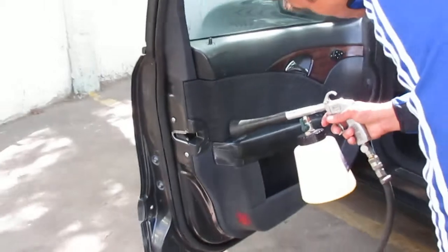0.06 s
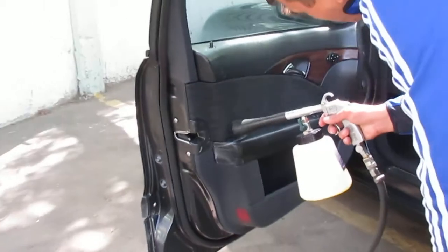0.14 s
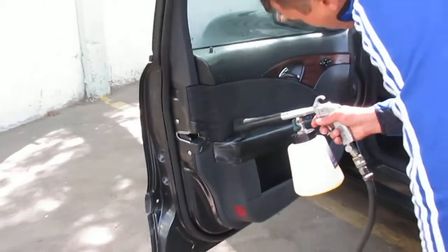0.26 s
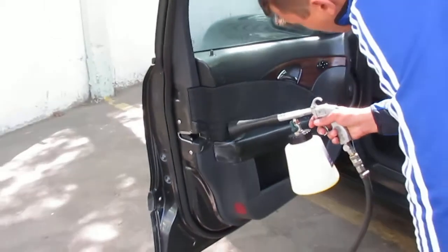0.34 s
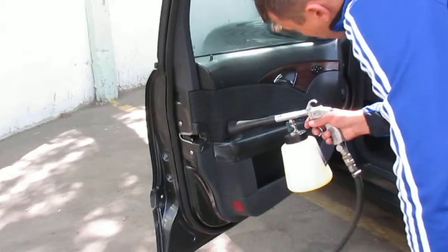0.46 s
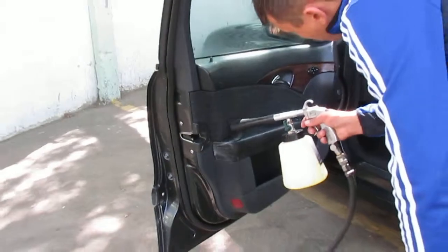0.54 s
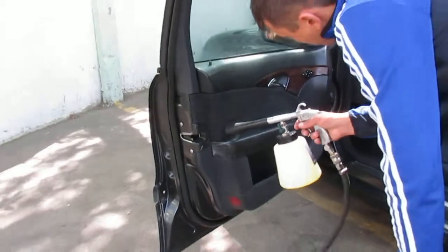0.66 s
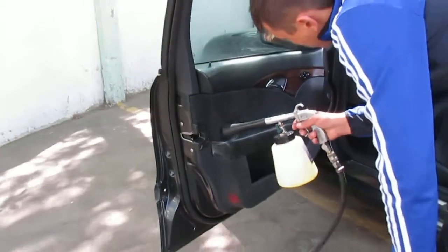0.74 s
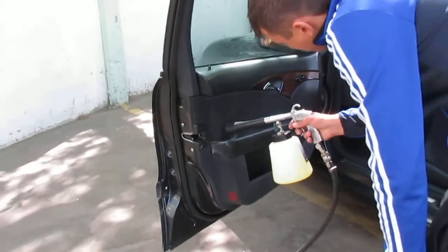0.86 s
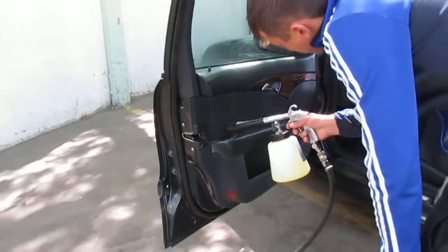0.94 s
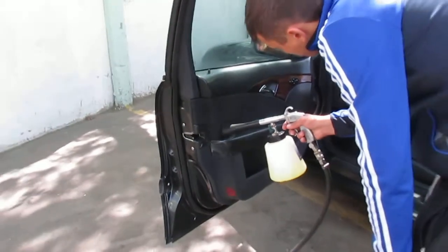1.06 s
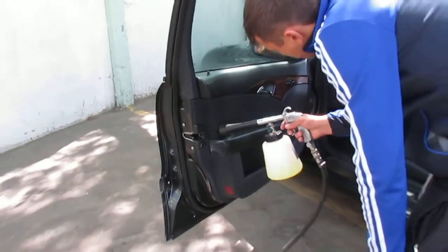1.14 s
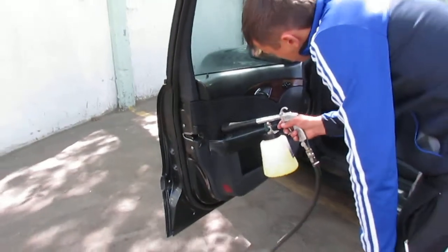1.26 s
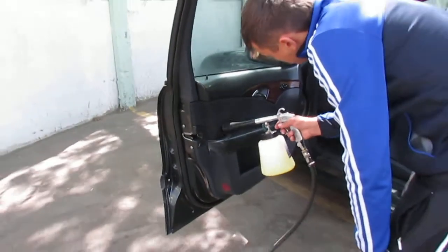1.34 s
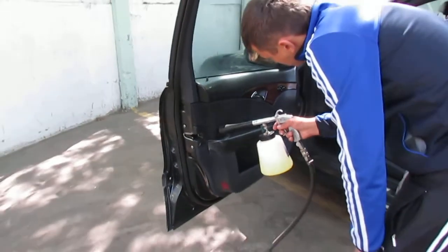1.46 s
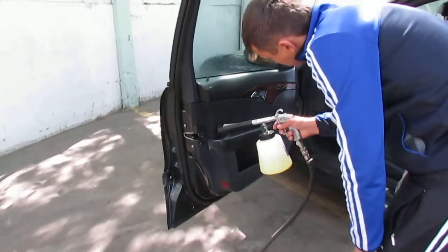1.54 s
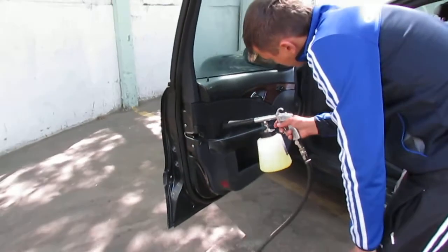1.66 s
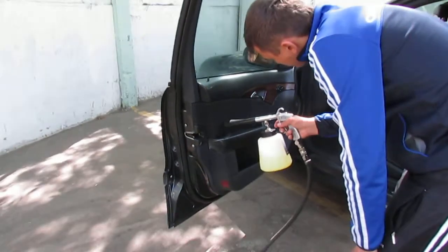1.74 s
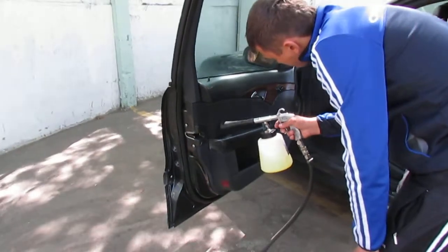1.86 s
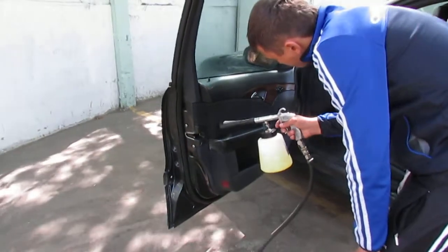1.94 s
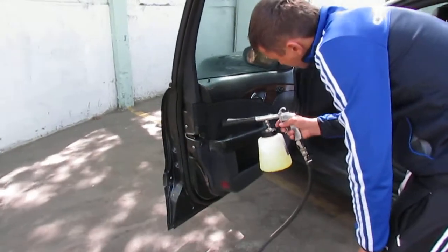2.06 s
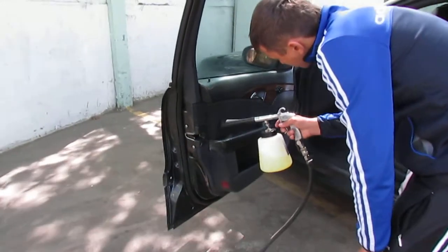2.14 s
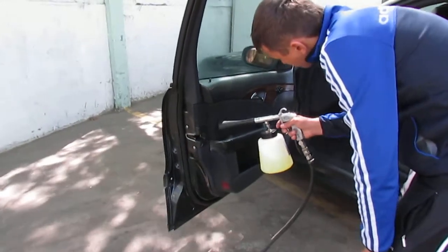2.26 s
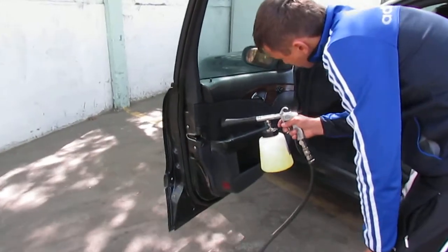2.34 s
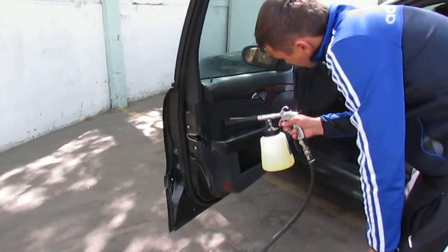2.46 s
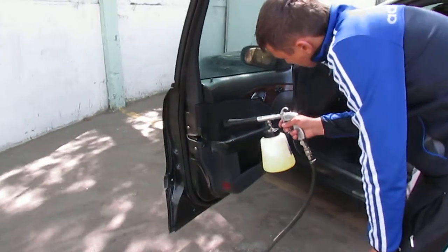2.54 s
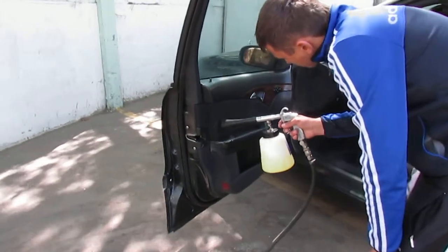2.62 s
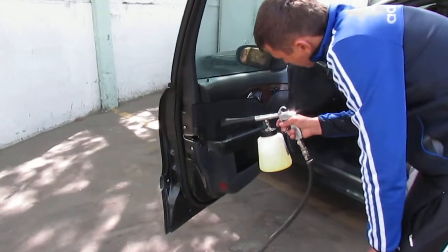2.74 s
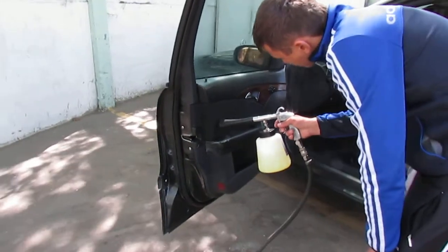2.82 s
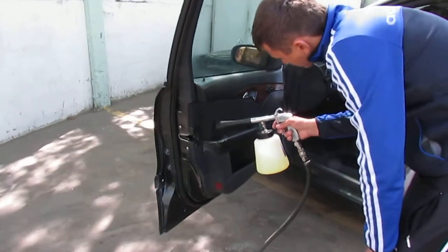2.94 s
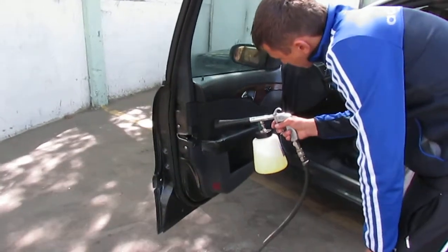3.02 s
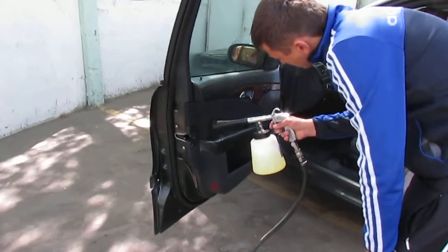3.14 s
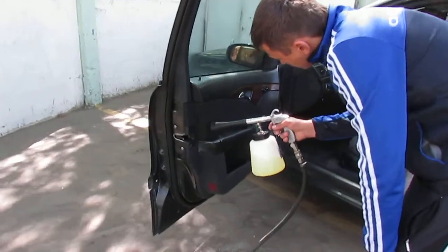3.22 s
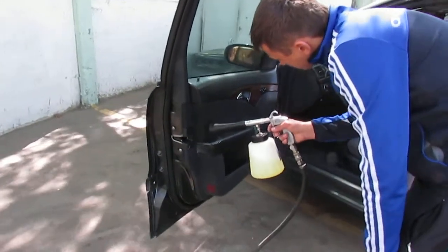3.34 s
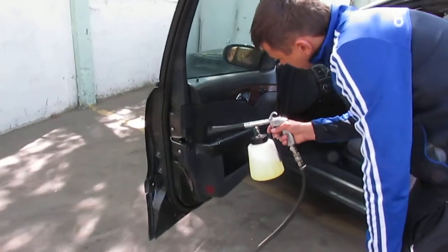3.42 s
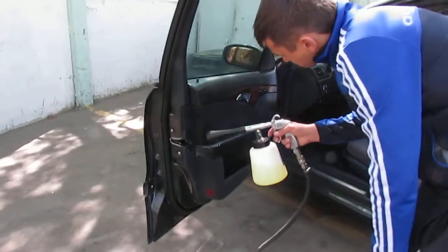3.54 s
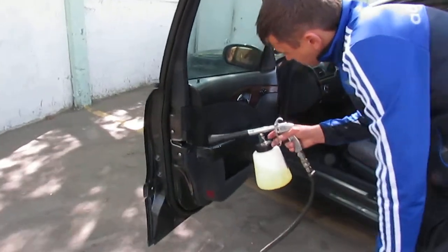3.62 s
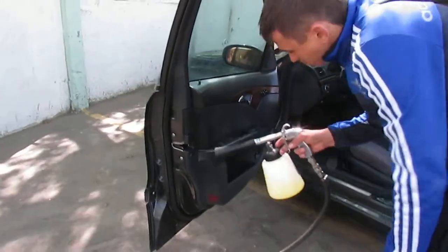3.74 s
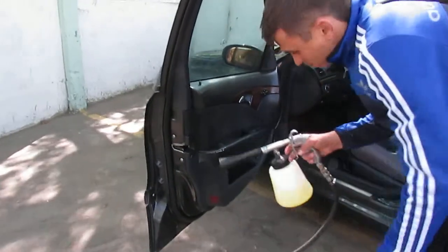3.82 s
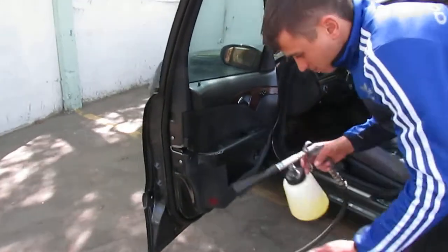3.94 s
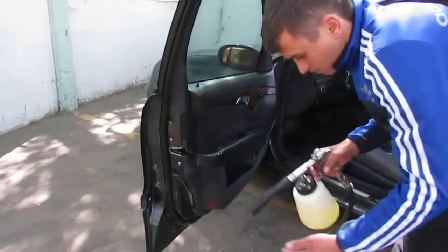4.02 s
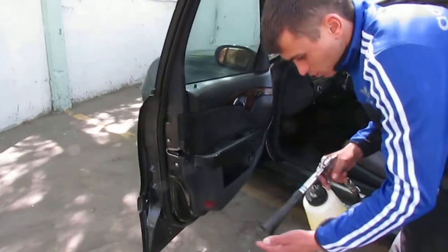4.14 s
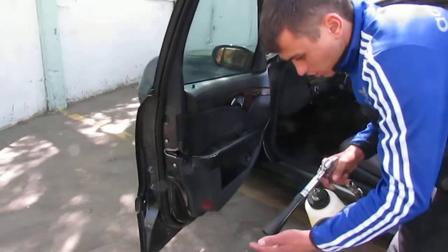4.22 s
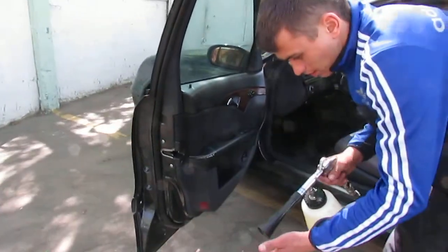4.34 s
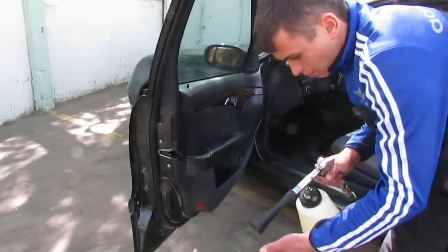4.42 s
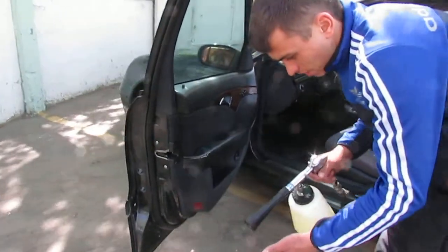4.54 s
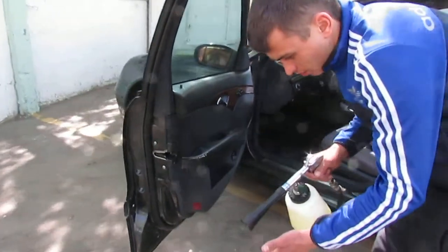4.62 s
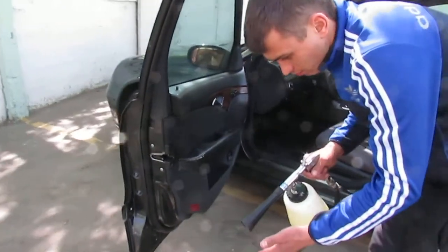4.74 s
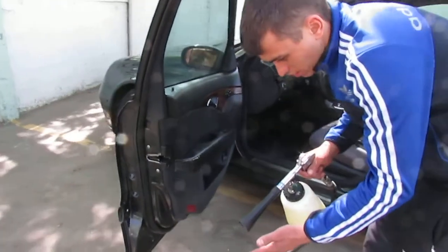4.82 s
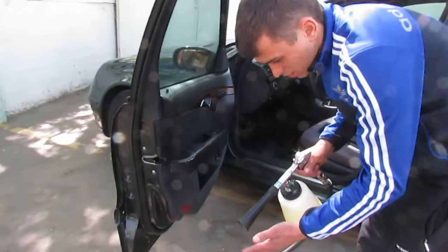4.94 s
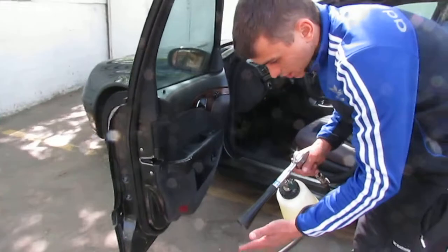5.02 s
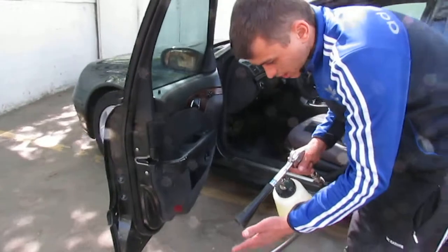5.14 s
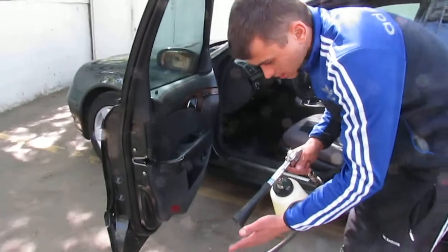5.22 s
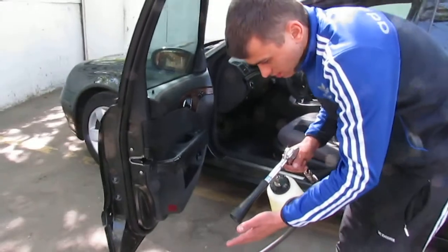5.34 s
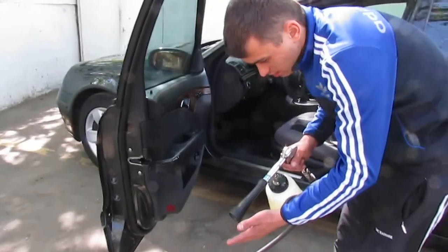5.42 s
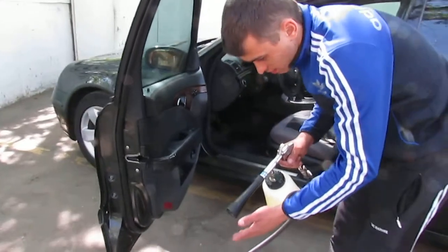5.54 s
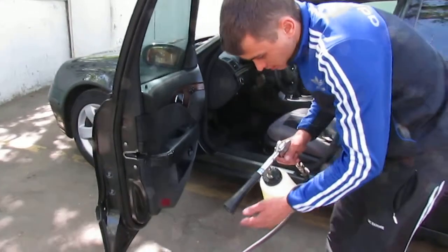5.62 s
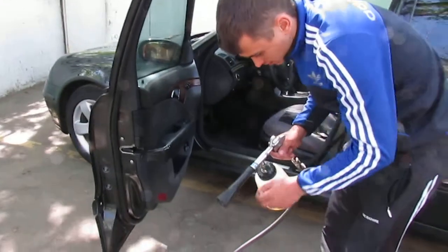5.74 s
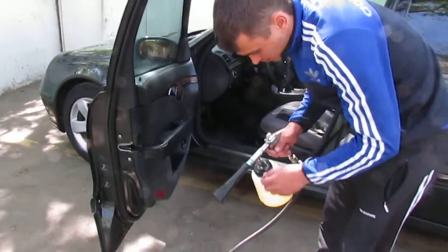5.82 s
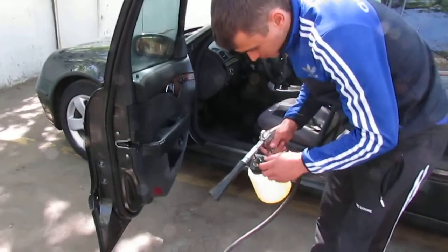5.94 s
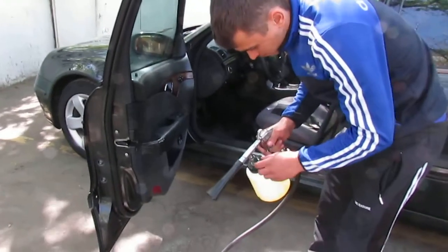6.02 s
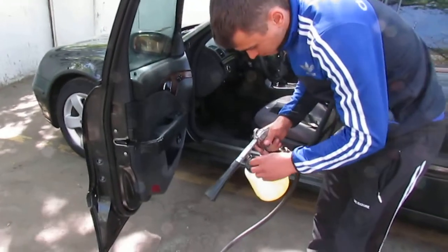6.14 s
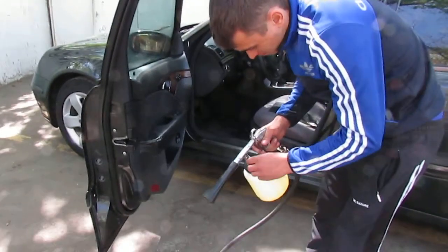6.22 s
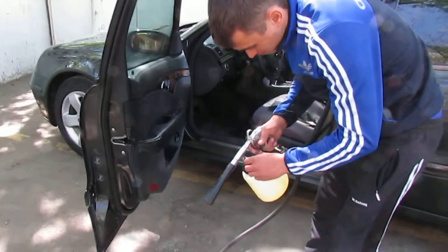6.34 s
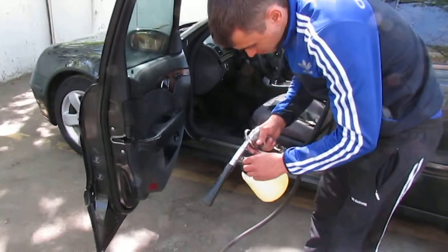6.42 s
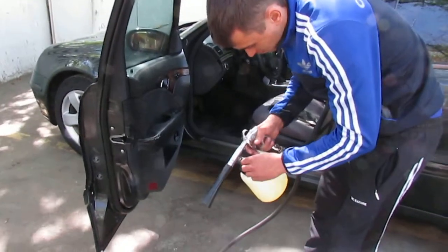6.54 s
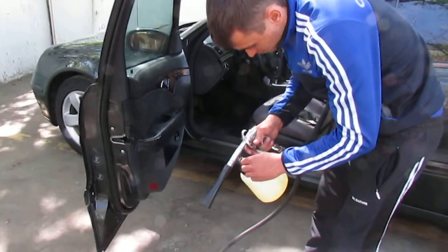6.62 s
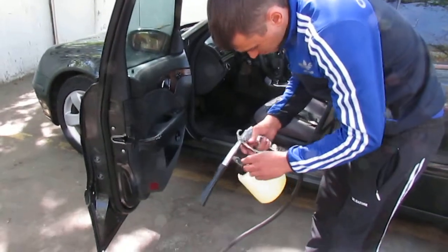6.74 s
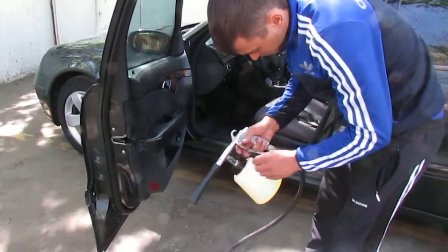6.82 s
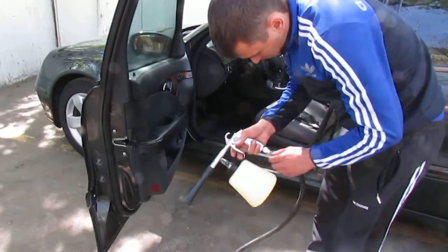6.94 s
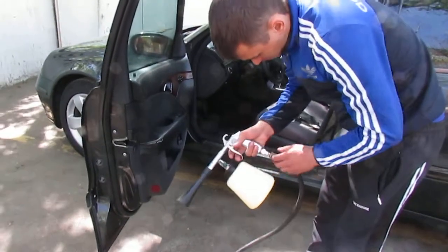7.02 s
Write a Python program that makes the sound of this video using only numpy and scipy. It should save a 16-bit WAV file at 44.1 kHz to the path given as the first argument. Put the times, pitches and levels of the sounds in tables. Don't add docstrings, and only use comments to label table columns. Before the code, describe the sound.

A compressed-air cleaning gun roars with bright hiss and a buzzing low hum, stops with a winding-down drop, blasts again briefly, then leaves faint leaking air.

```python
import sys
import numpy as np
from scipy import signal
from scipy.fft import rfft, irfft, next_fast_len
from scipy.io import wavfile
from scipy.ndimage import uniform_filter1d, map_coordinates

SR = 44100
rng = np.random.default_rng(int(sys.argv[2]) if len(sys.argv) > 2 else 0)


def ratio_of_db(decibels):
    return 10 ** (np.asarray(decibels, float) / 20)


def file_out(sig):
    cols = np.atleast_2d(sig).T
    lim = np.clip(cols, -1, 1)
    pcm = np.round(lim * 32767).astype(np.int16)
    wavfile.write(sys.argv[1], SR, pcm)


N = 312228

# (opens [s], shuts [s], coasting hum [dB], coasting [s], pressure left in hose [dB])
BLASTS = [
    (-.1, 3.603, -18.5, .115, -5),
    (4.273, 5.926, -18.5, 0.237, -1.5),
]
OPEN_S, SHUT_DB_PER_S, BLEED_DB_PER_S, HUM_SHUT_DB_PER_S = 0.011, 1300, 64, 524
# (time [s], closeness [dB], gap resonance [Hz], resonance lift [dB], turned to microphone [dB])
AIM_BY_BLAST = [
    [(0, -3, 850, 8, -1), (.65, -1, 863, 13.5, -1.5), (1.15, -5, 870, 10.5, -2.5), (1.62, -6, 885, 5, -2),
     (2.86, -5.2, 850, 7.5, -3.5), (3.0, -9.5, 1240, 4, -1.2), (3.25, -6.5, 1185, 7, -1.2),
     (3.42, -6, 1170, 10.5, -1.5), (3.56, -2, 620, 10.5, 0.5)],
    [(4.3, 0, 900, -4.5, 6), (4.45, -14, 890, 14, 2.5), (4.74, -18.5, 920, 22, 2.5),
     (5.0, -17, 1020, 10, 1.5), (5.1, -7, 880, 24, 2.5), (5.44, -10.5, 850, 20.5, 3.5),
     (5.55, -9, 850, 20, 6), (5.92, -16, 850, 18, 3)],
]
# (time [s], half length [s], lift [dB])
EDGES = [(.36, 0.028, 4.5), (.55, 0.016, -1), (.665, 0.11, 3), (.95, 0.11, 6.5), (1.1, 0.088, 6.5),
         (1.31, 0.037, 7), (1.45, 0.034, 7.5), (1.8, 0.017, 3), (2.1, 0.039, 1.5), (2.5, 0.044, 3.5),
         (2.88, 0.031, 2.5), (3.58, .03, 5.5), (5.14, 0.013, 1), (5.4, .05, 4), (5.88, 0.037, 1.5)]
GAP_WIDTH, GAP_DOUBLE, EDGE_RINGS_DB_PER_DB = 0.11, 0.98, 0.67

# (time [s], speed [Hz])
SPIN = [(0, 212.6), (1.1, 211.2), (2.2, 213.3), (3.6, 214.3), (3.82, 143), (3.9, 128), (4.28, 84),
        (4.446, 149), (4.58, 159), (4.66, 177), (4.756, 193), (4.9, 203), (5.06, 208.6), (5.3, 211.2),
        (5.93, 212.2), (6.07, 166), (6.142, 152), (6.25, 137)]
# (time [s], half length [s], lift [dB])
TILTS = [(.08, 0.15, 14.5), (.43, 0.12, 12), (.76, .09, 10), (1.12, 0.18, 10.5), (1.57, 0.088, 8.5),
         (2.2, 0.56, 7.5), (3.1, 0.57, 6.5), (3.52, 0.15, 5), (5.0, .32, 13)]
# door, palm [dB]
LOPSIDED_DB = [-34, -40]
# (order, on door [dB], on palm [dB])
SLAP_ORDERS = [(3, -37, -51.5), (4, -33.5, -54), (5, -37, -50.5), (6, -34, -66), (7, -37, -53),
               (8, -43.5, -52.5), (9, -42, -51), (10, -46, -54), (11, -47, -52), (12, -58, -57)]
FULL_HZ, HUM_DB, HUM_DB_PER_OCTAVE = 208, -19, 17
PALM_HUM_DB, HUM_DAMPED_DB_PER_DB, SLAP_GROWS_DB_PER_DB = 2.5, 0.17, 0.23

# (frequency [Hz], density [dB per Hz])
HISS = [(1470, -40), (2500, -5.5), (3760, -3), (5590, 1), (6030, -1), (6560, -2.5), (7840, 1), (8360, -7),
        (11500, -11.5), (15000, -46), (22000, -120)]
# (frequency [Hz], density [dB per Hz])
FIZZ = [(5290, -20), (9000, 0.5), (11900, -1.5), (13000, -1), (14500, -4.5), (15700, -3.5)]
# (frequency [Hz], density [dB per Hz])
DOOR_SPLASH = [(150, -60), (250, -22), (360, -15), (500, -14.5), (845, 1), (1150, -8.5), (1500, 0.5),
               (2200, -7), (3800, -10.5), (4940, -20.5), (8360, -120)]
# (frequency [Hz], density [dB per Hz])
PALM_SPLASH = [(160, -36), (280, 2.5), (500, -3.5), (900, 2), (1200, 2), (1790, 3.5), (2230, 0.5),
               (3800, -8), (4940, -18), (8360, -120)]
# (frequency [Hz], width [Hz], lift [dB])
CONE = [(900, 53, 1), (1733, 42, 3), (2720, 540, 2.5), (6610, 710, 4), (10470, 680, 2)]
# (frequency [Hz], width [Hz], lift [dB])
DOOR_SHADOW = [(3470, 390, -2.5), (6860, 830, -1.5)]
# (delay [ms], gain)
DOOR_ECHO = [(.24, 0.016), (1.15, 0.01), (1.43, 0.048), (1.71, 0.16), (2.53, 0.066), (3.3, 0.037)]
# (delay [ms], gain)
HAND_ECHO = [(.34, 0.033), (1.07, 0.13), (1.22, 0.074), (1.55, 0.098), (2.1, .06), (3.1, 0.057)]
# hiss, fizz, splash [dB]
BLEED_DB = [-28, -31.5, -14]
HISS_DB, FIZZ_DB, SPLASH_DB, PALM_SPLASH_DB, PALM_FIZZ_DB = -23.5, -19, -21, 4.5, -2
THROB = 0.23
FIZZ_TURNS_DB_PER_DB, FIZZ_HIDDEN_DB_PER_DB, FIZZ_TILTED_DB_PER_DB = 0.85, 0.18, 0.089

# (frequency [Hz], t60 [s])
WALLS_T60 = [(200, .3), (2000, 0.24), (10000, 0.26), (15000, 0.16)]

# (frequency [Hz], density [dB per Hz])
RUMBLE = [(20, -25), (50, -9.5), (100, -3.5), (200, -8.5), (400, -22.5), (800, -50.5), (3000, -120)]
# (time [s], half length [s], level [dB])
PUFFS = [(0, 0.14, -43), (.41, .05, -42), (1.87, 0.1, -48), (2.09, 0.14, -45), (2.38, 0.11, -60),
         (2.57, 0.046, -25), (2.8, 0.3, -32.5), (3.03, .05, -45), (3.47, 0.022, -31), (3.81, .04, -34),
         (3.89, 0.045, -37.5), (3.95, 0.023, -49), (4.03, 0.046, -35), (4.075, 0.014, -40),
         (4.3, 0.073, -48), (4.52, .06, -38), (4.75, 0.14, -46), (5.19, .05, -52), (6.6, 0.8, -50.5)]
# (time [s], push, width [ms])
GUSTS = [(.405, .05, 3.6), (1.88, -0.061, 3), (2.079, 0.032, 3.92), (2.349, -0.046, 4), (2.423, 0.1, 2.98),
         (2.5, 0.039, 3), (2.547, -0.079, 3.4), (2.5571, -0.35, 0.81), (2.596, 0.26, 2.4),
         (2.646, 0.23, 1.5), (2.715, -0.032, 2.2), (2.736, -0.12, 2.9), (2.758, 0.23, 1.1),
         (2.927, 0.087, 2.9), (3.053, 0.18, 2.3), (3.438, 0.18, 2.2), (3.496, 0.028, 3.2),
         (3.808, -0.11, 1.9), (3.941, 0.1, 2.3), (4.064, 0.12, 1.2), (4.084, 0.082, 1.4)]
CALM_DB = -64.5

# (frequency [Hz], density [dB per Hz])
TRAFFIC = [(24, -38), (40, -8.5), (100, -19), (180, -11), (400, -13), (600, -16), (1000, -17.5),
           (1400, -22), (2500, -29.5), (4500, -43), (6000, -61), (12000, -67.5), (15500, -56.5)]
# (frequency [Hz], width [Hz], lift [dB])
DRONE = [
    (300, 130, 4.5),
    (972, 150, 10.5),
]
# (frequency [Hz], density [dB per Hz])
LEAK = [(1760, -41.5), (3000, -12), (4300, -8.5), (5600, -11), (7300, -9.5), (9000, -7), (9600, -18),
        (13800, -26), (15500, -42.5)]
# (frequency [Hz], width [Hz], lift [dB])
COUPLING = [(5360, 400, 4), (6480, 260, 12), (8550, 720, 1), (11800, 120, 11), (13600, 150, 1)]
# (frequency [Hz], density [dB per Hz])
LEAK_EDGE = [(8000, -54), (9200, 7.5), (9800, 2.5), (10300, 7), (10800, -31), (12000, -120)]
TRAFFIC_DB, LEAK_DB, LEAK_DB_PER_S, EDGE_DB, EDGE_DB_PER_S = -52, -52.5, 12.5, -46.5, 28.5

# (time [s], length [s], start frequency [Hz], level [dB], width [Hz])
WHISTLES = [
    (3.63, .2, 3980, -50, 130),
    (4.51, .08, 655, -28, .5),
    (4.58, .2, 615, -39, .5),
    (6.02, .2, 3960, -57, 220),
    (6.12, .09, 445, -37, .5),
    (6.02, .22, 1420, -49, 40),
]
WHISTLE_SAG_HZ_PER_S = 430

# (time [s], peak [dB])
TICKS = [
    (4.0404, -30.5),
    (4.1929, -40.5),
    (4.239, -41),
]
# (frequency [Hz], gain [dB])
TICK_COLOUR = [(600, -28), (1500, 1.5), (6000, -6.5), (8000, -19), (11000, -70)]

# (frequency [Hz], density [dB per Hz])
SPRAY = [(250, -40), (500, -31.5), (900, 5), (2500, 4), (5000, 3), (9000, -23), (15000, -66.5)]
SPIT_S, SPIT_FADE_S, SPIT_DB, SPIT_SLAP_DB = 0.12, 0.02, -23.5, 17

# (time [s], drop [dB])
DUCKS = [(-.5, 5), (.675, 3.5), (1.59, 0.2), (2.565, 3), (3.57, 6), (4.331, 3.5), (5.461, 3.5)]
DUCK_S, RECOVER_S = 0.019, 1.085


def unit(x):
    return x / np.sqrt(np.mean(x ** 2) + 1e-20)


def along(points, hz):
    f, v = np.transpose(points)
    return np.interp(np.log(hz + 1), np.log(f + 1), v)


def curves(tables):
    s, *cols = np.vstack(tables).T
    return [np.interp(np.arange(N) / SR, s, c) for c in cols]


def sounding(*spans):
    t = np.arange(N) / SR
    inside = sum(1. * ((t >= a) & (t < b)) for a, b in spans)
    return uniform_filter1d(inside, size=200)


def wobble(rate_hz):
    return map_coordinates(rng.standard_normal(500), [np.arange(N) * rate_hz / SR], mode="wrap")


def swells(rows, gain=lambda db: db):
    t = np.arange(N) / SR
    return sum(gain(db) * np.exp(-((t - s) / half_s) ** 2) for s, half_s, db in rows)


def filtered(x, response):
    m = next_fast_len(N + SR // 2)
    return irfft(rfft(x, m) * response(np.fft.rfftfreq(m, 1 / SR)), m)[:N]


def peaks(modes):
    return lambda hz: ratio_of_db(sum(db / (1 + (2 * (hz - c) / w) ** 2) for c, w, db in modes))


def rush(spectrum, patchy_db, gate=1):
    z = signal.stft(rng.standard_normal(N + 512), nperseg=512)[2]
    field = uniform_filter1d(rng.standard_normal(z.shape), size=5, axis=0)
    field = uniform_filter1d(field, size=16, axis=1)
    air = signal.istft(z * ratio_of_db(patchy_db * unit(field)), nperseg=512)[1][:N]
    return unit(filtered(gate * air, lambda hz: ratio_of_db(along(spectrum, hz))))


def echoed(x, echoes):
    n = np.arange(N)
    out = x
    for ms, gain in echoes:
        delay = SR * ms / 1000 * (1 + 0.043 * wobble(1.04))
        out = out + gain * map_coordinates(x, [n - delay], order=3)
    return out


def valve(left_db, fade_db_per_s, shut_db_per_s=SHUT_DB_PER_S, sign=1):
    t = np.arange(N) / SR
    gain = 0
    for (opens, shuts, *_), db in zip(BLASTS, left_db):
        after_shut = np.clip(t - shuts, 0, None)
        opening = np.clip((t - opens) / OPEN_S, 0, 1) * (t < shuts + .5)
        remainder = sign * ratio_of_db(db - fade_db_per_s * after_shut)
        gain = gain + opening * (ratio_of_db(-shut_db_per_s * after_shut) + remainder)
    return gain


def holding():
    close_db, gap_hz, ring_db, facing_db = curves(AIM_BY_BLAST)
    edge_db = swells(EDGES)
    lift_db = ring_db + EDGE_RINGS_DB_PER_DB * edge_db
    hump = lambda hz: lift_db / (1 + ((hz / gap_hz - 1) / GAP_WIDTH) ** 2)
    gap = lambda hz: hump(hz) + GAP_DOUBLE * hump(hz / 2)
    palm = 1 * (np.arange(N) > SR * (BLASTS[1][0] - .1))
    return close_db + edge_db, gap, facing_db, palm


def spitting():
    u = np.arange(N) / SR - BLASTS[1][0]
    return np.clip(u / OPEN_S, 0, 1) * np.exp(-(np.clip(u - SPIT_S, 0, None) / SPIT_FADE_S) ** 2)


def tube():
    speed_hz, = curves([SPIN])
    close_db, gap, _, palm = holding()
    angle = 2 * np.pi * np.cumsum(speed_hz * (1 + 0.0016 * wobble(29.42))) / SR

    def order(k, db, lag, flicker_db):
        level = ratio_of_db(db + flicker_db * wobble(40))
        return level * np.cos(k * angle + lag + 0.33 * flicker_db * wobble(22))

    drive_db = HUM_DB_PER_OCTAVE * np.log2(speed_hz / FULL_HZ)
    damped_db = HUM_DAMPED_DB_PER_DB * np.clip(curves(AIM_BY_BLAST)[0], -3, None)
    hum_db = HUM_DB + drive_db + PALM_HUM_DB * palm - damped_db
    spit_db = SPIT_SLAP_DB * spitting()
    second_db = np.take(LOPSIDED_DB, palm) + swells(TILTS) + drive_db + 1.8 * spit_db
    hum = order(1, hum_db, 0, .4) + order(2, second_db, 2.6, 1.1)
    slaps = 0
    for k, *surface_db in SLAP_ORDERS:
        db = np.take(surface_db, palm) + SLAP_GROWS_DB_PER_DB * close_db + gap(k * speed_hz) + spit_db
        lag = .6 if k == 4 else (k + 1) * np.pi + .9 * k
        slaps = slaps + order(k, db, lag, 2.2)
    coast_db = [b[2] + 0.61 * wobble(25) for b in BLASTS]
    turning = valve(coast_db, -23.5, HUM_SHUT_DB_PER_S, sign=-1.206)
    turning = turning * sounding(*[(a, b + coast_s) for a, b, _, coast_s, _ in BLASTS])
    return np.sqrt(2) * (hum * turning + slaps * valve([-22, -24], BLEED_DB_PER_S)), angle


def jet(angle):
    close_db, _, facing_db, palm = holding()
    fizz_db = FIZZ_DB + .8 + FIZZ_TURNS_DB_PER_DB * facing_db - FIZZ_HIDDEN_DB_PER_DB * close_db
    fizz_db = fizz_db + PALM_FIZZ_DB * palm + FIZZ_TILTED_DB_PER_DB * swells(TILTS)
    splash_db = SPLASH_DB - 3.5 + 0.64 * close_db + 0.36 * wobble(20)
    hiss_flow, fizz_flow, splash_flow = (valve([db, db], BLEED_DB_PER_S) for db in BLEED_DB)

    def throb(share, lag):
        return np.exp(share * THROB * (np.cos(angle + lag) + 0.57 * np.cos(2 * angle + lag)))

    door, hand = sounding((0, 3.8)), sounding((4.265, 6.2))
    air = hiss_flow * ratio_of_db(HISS_DB + 1.5 + facing_db) * rush(HISS, 1.1, throb(1.15, 2))
    air += fizz_flow * ratio_of_db(fizz_db) * rush(FIZZ, 1.2, throb(1.3, 1.9))
    splash = door * rush(DOOR_SPLASH, 0.71, throb(1.0, 2.9))
    splash += ratio_of_db(PALM_SPLASH_DB) * hand * rush(PALM_SPLASH, 1.6, throb(0.7, 3.1))
    air += splash_flow * ratio_of_db(splash_db) * splash
    t = np.arange(N) / SR
    bleed = ratio_of_db(-150 * (np.clip(t - 3.73, 0, .2) * (t < 4) + np.clip(t - 6.1, 0, .2)))
    air = filtered(air * ratio_of_db(0.14 * wobble(12)) * bleed, peaks(CONE)) * ratio_of_db(-0.01)
    at_door = echoed(filtered(air, peaks(DOOR_SHADOW)), DOOR_ECHO)
    return door * at_door + hand * echoed(air, HAND_ECHO)


def walls(x):
    hz, t, z = signal.stft(rng.standard_normal(SR // 2), SR, nperseg=256)
    decay = ratio_of_db(-60 * t / along(WALLS_T60, hz)[:, None])
    tail = signal.istft(z * decay, SR, nperseg=256)[1]
    return signal.fftconvolve(x, tail / np.linalg.norm(tail))[:N]


def buffet():
    strength = np.sqrt(ratio_of_db(2 * CALM_DB) + swells(PUFFS, lambda db: ratio_of_db(2 * db)))
    wind = strength * ratio_of_db(2.5) * unit(ratio_of_db(3.2 * wobble(30)) * rush(RUMBLE, 0.76))
    t = np.arange(N) / SR
    for s, push, ms in GUSTS:
        start = round(s * SR) - 800
        u = (t[start:][:1600] - s) * 1000 / ms
        wind[start:][:1600] += push * (1 - u * u) * np.exp(-u * u / 2)
    return wind


def yard():
    t = np.arange(N) / SR

    def pressure(db_per_s):
        return sum(ratio_of_db(db - db_per_s * np.clip(t - b, 0, None)) * (t > a) for a, b, *_, db in BLASTS)

    traffic = unit(filtered(rush(TRAFFIC, 0.38), peaks(DRONE)))
    leak = unit(filtered(rush(LEAK, 1.2), peaks(COUPLING)))
    edge = ratio_of_db(EDGE_DB) * pressure(EDGE_DB_PER_S) * rush(LEAK_EDGE, 1.5)
    return ratio_of_db(TRAFFIC_DB + 12.5) * traffic + ratio_of_db(LEAK_DB + 7.0) * pressure(LEAK_DB_PER_S) * leak + edge


def whistles():
    out = np.zeros(N + SR)
    for s, length_s, start_hz, db, width_hz in WHISTLES:
        u = np.arange(round(length_s * SR)) / (length_s * SR)
        pitch_hz = start_hz - WHISTLE_SAG_HZ_PER_S * length_s * u
        steady = np.exp(-width_hz / 10)
        breath = steady + wobble(3 * width_hz)[:len(u)] * (1 - steady)
        tone = np.sin(2 * np.pi * np.cumsum(pitch_hz) / SR)
        out[round(s * SR):][:len(u)] += ratio_of_db(db) * breath * np.sin(np.pi * u) ** 0.43 * tone
    return out[:N]


def trigger():
    out, t = np.zeros(N), np.arange(SR // 30) / SR
    for s, db in TICKS:
        out[round(s * SR):][:len(t)] = ratio_of_db(db + 6.5 - 60 * t / 0.079) * rng.standard_normal(len(t))
    return filtered(out, lambda hz: ratio_of_db(along(TICK_COLOUR, hz)))


def spits(angle):
    bursts = np.exp(0.9 * np.cos(angle + 0.5)) * ratio_of_db(5.1 * wobble(59))
    return ratio_of_db(SPIT_DB) * spitting() * bursts * rush(SPRAY, 2.3)


def scene():
    hum, angle = tube()
    air = jet(angle) + spits(angle)
    mono = hum + air + ratio_of_db(-17.0) * walls(air)
    mono = mono + buffet() + yard() + whistles() + trigger()
    return np.array([mono, mono])


def ducking():
    t = np.arange(N) / SR
    drop_db = 0
    for s, db in DUCKS:
        recovery = np.exp(-np.clip(t - s, 0, None) / RECOVER_S)
        drop_db = drop_db + db * np.clip((t - s) / DUCK_S, 0, 1) * recovery
    return ratio_of_db(-drop_db)


def low_pass(x):
    return signal.sosfilt(signal.butter(12, 15700, fs=SR, output="sos"), x)


def record(dry):
    def response(hz):
        notch = 1 - .95 / (1 + ((hz - 7868) / 70) ** 2)
        return notch * np.clip((15800 - hz) / 150, 0, 1)

    mono = np.clip(filtered(dry[0] * ducking(), response), -.99, .99)
    return low_pass(np.array([mono, mono]))


dry = scene()
out = record(dry)
file_out(out)
```